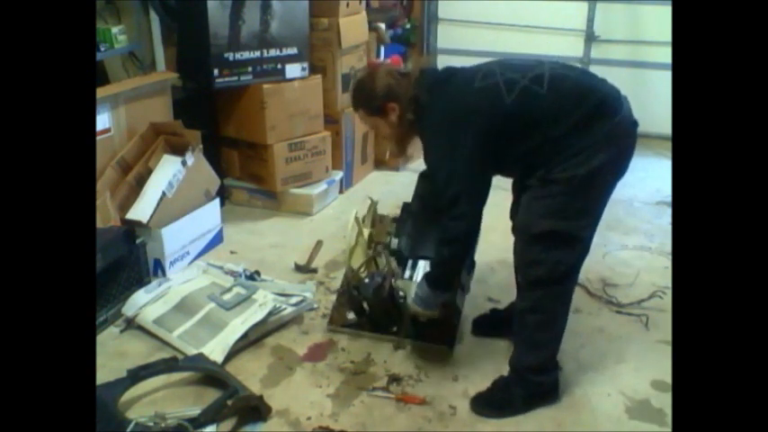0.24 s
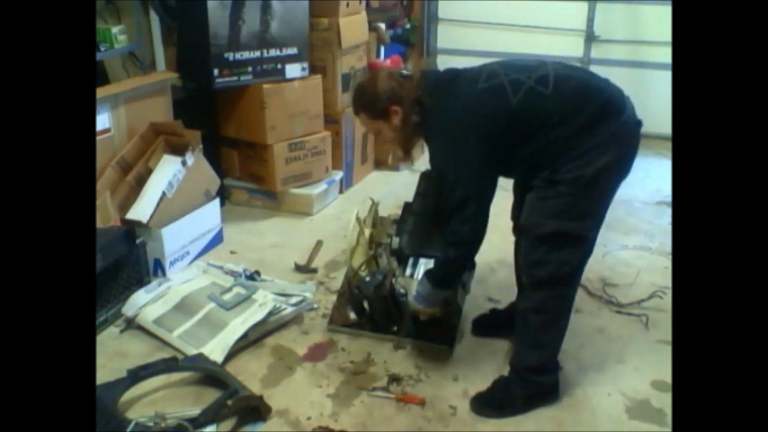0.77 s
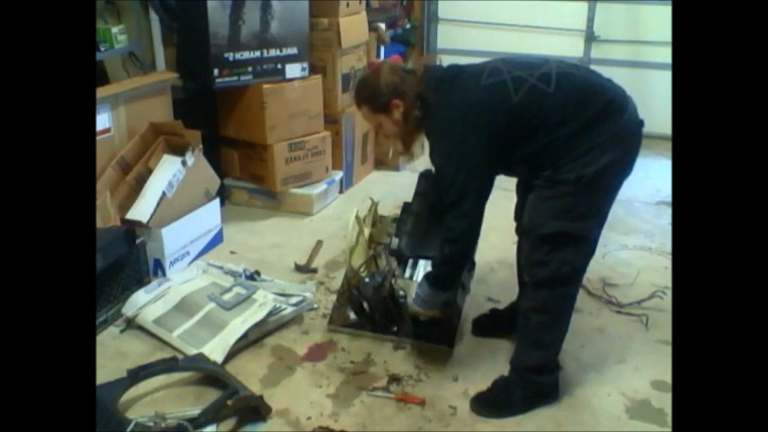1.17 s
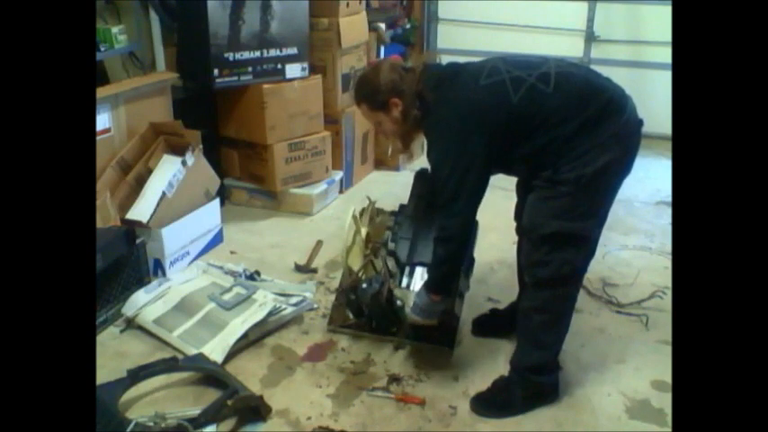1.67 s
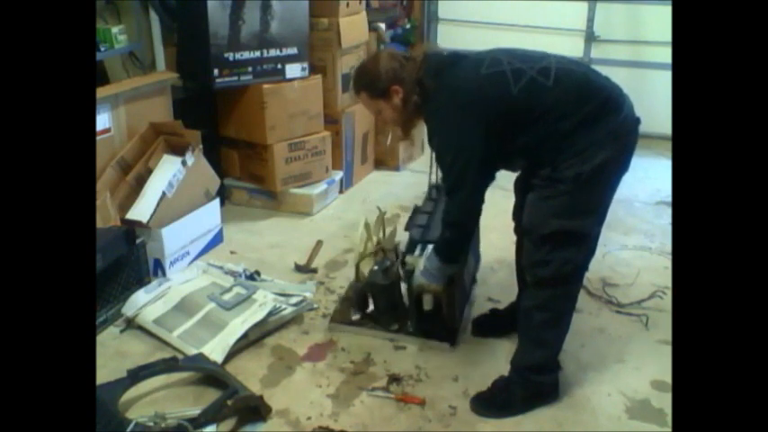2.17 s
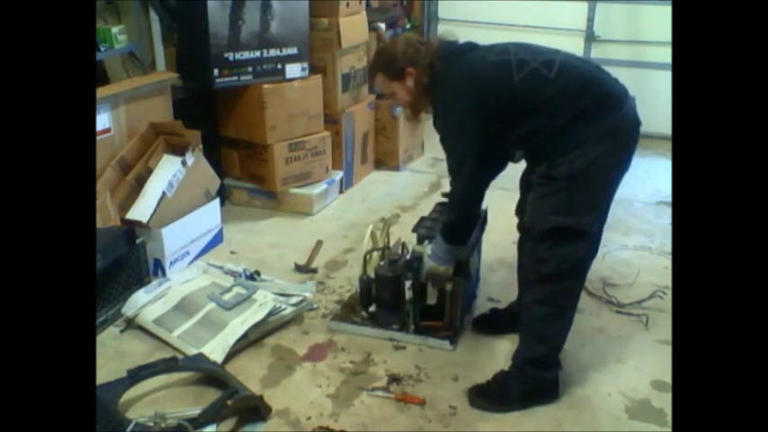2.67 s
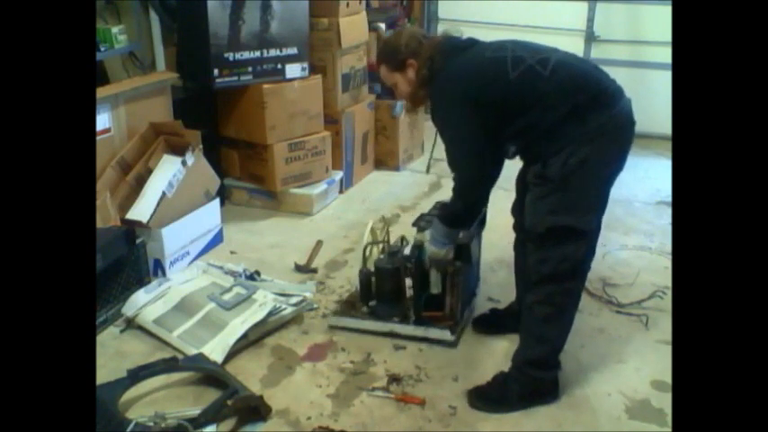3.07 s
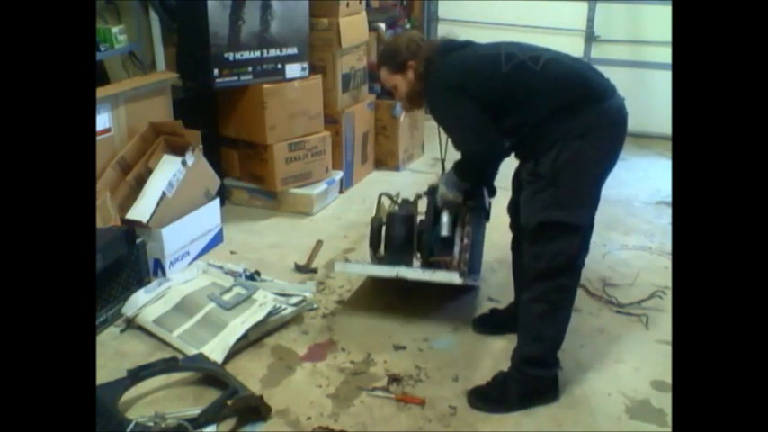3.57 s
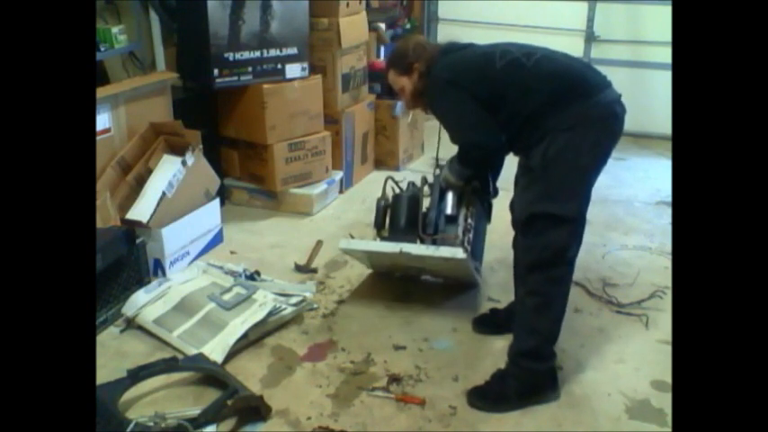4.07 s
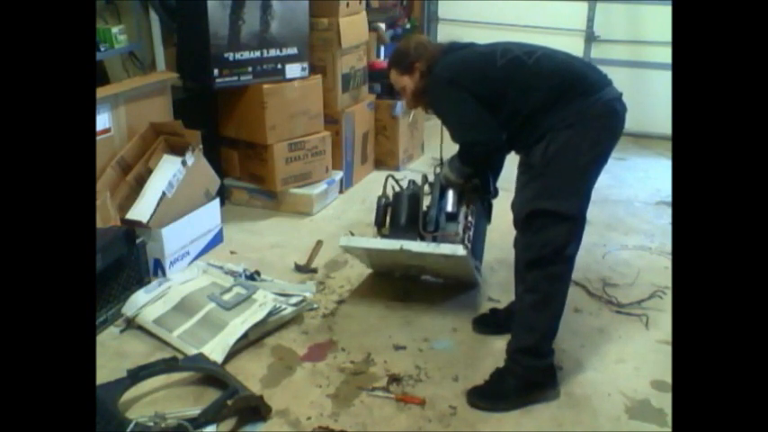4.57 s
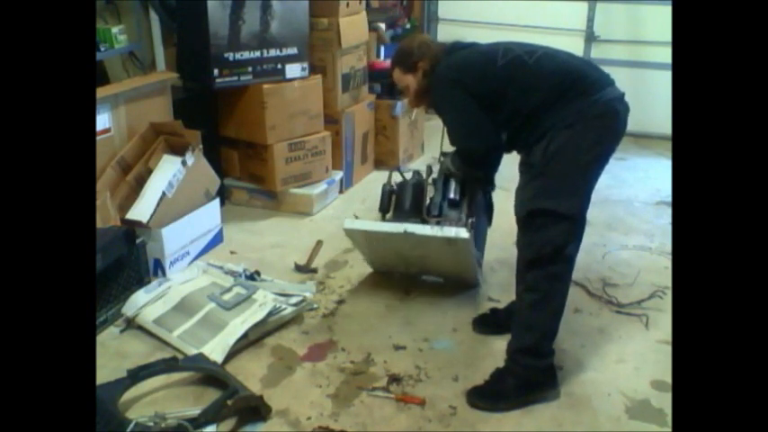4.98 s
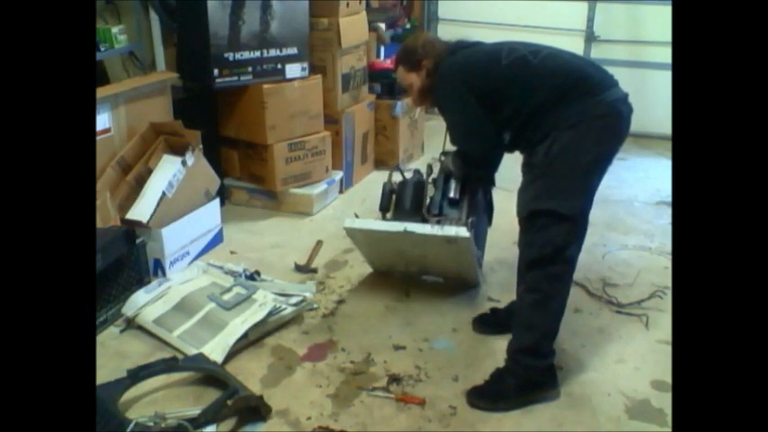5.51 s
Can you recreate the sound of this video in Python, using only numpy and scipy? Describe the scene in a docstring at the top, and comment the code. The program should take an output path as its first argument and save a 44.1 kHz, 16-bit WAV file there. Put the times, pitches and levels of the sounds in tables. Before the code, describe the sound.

A short fading hiss of escaping gas, followed by steel base knocks, gritty scrapes and a loose metallic clank in a garage over a low hum.

```python
"""Refrigerant hisses from a cut line, as turbulent noise whose level sags with its pressure.
A cooling unit is handled on a concrete garage floor: its steel base pan knocks and scrapes, its copper
tubing ticks and squeaks, and a loose part clanks. Each impact excites dense and clear modes in the garage.
A machine drones behind as an uneven, fluttering hum with partials, over shaped room noise and faint tones."""
import sys
import numpy as np
from scipy import signal
from scipy.fft import rfft, irfft, next_fast_len
from scipy.io import wavfile
from scipy.ndimage import map_coordinates

SR = 44100
rng = np.random.default_rng(int(sys.argv[2]) if len(sys.argv) > 2 else 0)


def store_wav(level_fs):
    """Save 16-bit WAV to argv[1]."""
    pcm = np.round(np.clip(np.atleast_2d(level_fs), -1, 1) * 32767)
    wavfile.write(sys.argv[1], SR, pcm.T.astype(np.int16))


N = 253393
TIME = np.arange(N) / SR
RING = 2 ** 15  # samples in one impact response

# Dense ring of the steel base pan. Each row: frequency in Hz, relative spectral density in dB.
PAN_COLOUR = [(30, -1.5), (70, -4), (115, 7.5), (150, -11), (195, 4), (330, 6), (550, 5), (1000, 3),
              (1200, 0.5), (2100, -2.5), (2750, -11), (3300, -19.5), (11000, -34), (15000, -48.5)]
# Strongest modes of the pan. Each row: frequency in Hz, relative level in dB, 60 dB decay time in seconds.
PAN_MODES = [(112.5, -18.5, .3), (201.3, -7, 0.21), (316, -4.5, 0.26), (416, 3.5, 0.24), (495, -2, 0.2),
             (545.8, -7, 0.26), (566, -4.5, 0.24), (697, -9.5, 0.33), (779, -13.5, 0.42), (899, -2, 0.1),
             (1063.5, -8, 0.24), (1230, -24.5, .25), (1300, -25, 0.43), (2203, -18.5, 0.35),
             (8200, -42.5, 0.31)]


def gain_of(db):
    """Level definition: decibels to an amplitude ratio."""
    return 10 ** (np.asarray(db) / 20)


def evened(x):
    """Normalization: scales to an rms of 1."""
    return x / np.sqrt(np.mean(x ** 2) + 1e-20)


def read(points, hz):
    """Spectral interpolation: joins the points on a log-frequency axis."""
    f, value = np.transpose(points)
    return np.interp(np.log(hz + 1), np.log(f + 1), value)


def add(mix, s, sound):
    """Superposition: mixes a sound in at time s, in seconds."""
    part = mix[round(s * SR):][:len(sound)]
    part += sound[:len(part)]


def noise(colour, peaks=()):
    """Spectral shaping: white noise takes a given spectrum and resonances, at an rms of 1."""
    size = next_fast_len(N)
    hz = np.fft.rfftfreq(size, 1 / SR)
    db = read(colour, hz)
    for f, width, lift in peaks:
        db = db + lift / (1 + (2 * (hz - f) / width) ** 2)
    spectrum = rfft(rng.standard_normal(size)) * gain_of(db)
    return evened(irfft(spectrum, size)[:N])


def waver(rate):
    """Random modulation: splined chance of rms 1 with about rate changes a second."""
    knots = rng.standard_normal(2048)
    coarse = evened(map_coordinates(knots, [TIME[::64] * rate], order=2, mode="wrap"))
    return coarse.repeat(64)[:N]  # each value is held for 64 samples


def ripple(hz, spacing_hz):
    """Random modal response: chance peaks and dips along the frequency axis, rms 1."""
    knots = rng.standard_normal(1024)
    return evened(map_coordinates(knots, [hz / spacing_hz], order=2, mode="wrap"))


def causal(x, gain):
    """Minimum phase: filters with the least delay, so that nothing sounds before a blow."""
    log_gain = np.log(np.maximum(np.r_[gain, gain[-2:0:-1]], 1e-5))
    response = np.exp(np.conj(signal.hilbert(log_gain)))[:len(gain)]
    return irfft(rfft(x) * response)


def echoes(early, early_s, direct):
    """Room impulse response: direct sound, strong near reflections, then frequency-dependent decay."""
    # Reverberation of the garage. Each row: frequency in Hz, 60 dB decay time in seconds.
    decay_times = [(100, 0.28), (300, 0.37), (700, 0.41), (1700, 0.46), (4600, 0.39), (12000, 0.27)]
    t = np.arange(RING) / SR
    taps = rng.choice([-1., 1.], RING) * (rng.random(RING) < np.minimum(.06 + 3 * t, 1))
    taps /= np.sqrt(np.minimum(0.073 + 3 * t, 1))  # reflections crowd together with time
    hz, at, z = signal.stft(taps, SR, nperseg=256)
    decay = gain_of(-60 * at / read(decay_times, hz)[:, None])
    tail = signal.istft(z * decay, SR, nperseg=256)[1][:RING]
    tail *= 1 + early * np.exp(-t / early_s)
    tail[0] += direct
    return tail / (1 + early / 2)


def strike(colour, modes, force_db, hard_db, weight_db, ring_db, tick_db,
           early, early_s, direct, rise_s, uneven_db):
    """Modal excitation: a blow rings dense and clear modes; weight sets bass, contact hardness treble."""
    t, hz = np.arange(RING) / SR, np.fft.rfftfreq(RING, 1 / SR)
    top_db = tick_db + 1.57 * hard_db  # the top treble grows faster with hardness
    contact = [(400, weight_db), (1100, 0), (2300, 0), (3800, hard_db), (6000, hard_db), (9000, top_db)]
    # each contact point favours its own groups of high modes
    spot = uneven_db * ripple(hz, 170) * hz / (hz + 1500)
    body = evened(gain_of(read(colour, hz)))
    dense = causal(echoes(early, early_s, direct), body * gain_of(read(contact, hz) + spot))
    ring = np.zeros(RING)
    for f, db, t60 in modes:
        ring += gain_of(db - 60 * t / t60) * np.sin(2 * np.pi * (f * t + rng.random()))
    ring *= 1 - np.exp(-t / rise_s)
    return gain_of(force_db) * (dense + gain_of(ring_db) * ring)


def blows(rows, colour, modes, **ringing):
    """Superposition of single impacts on one object."""
    out = np.zeros(N)
    for s, *touch in rows:
        add(out, s, strike(colour, modes, *touch, **ringing))
    return out


def air(level_db=-72, waver_db=2):
    """Ambient noise: a broadband spectrum with a few faint tones of wavering level and phase."""
    # Still air of the garage. Each row: frequency in Hz, relative spectral density in dB.
    air_colour = [(20, -2), (45, 4.5), (70, 1), (130, -3), (200, -10.5), (330, -13.5), (500, -16.5),
                  (900, -18), (2200, -26), (3300, -31), (6000, -33.5), (10000, -32), (13000, -39),
                  (15000, -55)]
    # Faint tones of fixed pitch whose level and phase waver. Each row: frequency in Hz, mean level in dB.
    faint_tones = [(141, -81.5), (211, -90.5), (283, -83.5), (426, -94), (9720, -100.5)]
    tones = np.zeros(N)
    for f, db in faint_tones:
        phase = 2 * np.pi * f * TIME + 0.53 * waver(12)
        tones += gain_of(db + waver_db * waver(1.8)) * np.sin(phase)
    return gain_of(level_db) * noise(air_colour) + np.sqrt(2) * tones


def drone(pitch_hz=90, wander=0.01184, waver_db=3, rumble_db=-18):
    """Harmonic series: a machine's hum rises and dips unevenly and flutters by chance, over a rumble."""
    # Uneven rises and dips of the hum, some within a tenth of a second.
    # Each row: time in seconds, level in dB.
    hum_levels = [(0.0, -66), (0.18, -69), (0.33, -56.5), (0.68, -63.5), (0.99, -63.5), (1.49, -52),
                  (1.63, -65.5), (1.93, -54.5), (2.1, -70), (2.35, -52.5), (2.43, -68), (2.58, -54.5),
                  (3.48, -61), (3.72, -66.5), (4.09, -54.5), (5.01, -65.3), (5.58, -66.5), (5.74, -52.5)]
    # Partials. Each row: multiple of the pitch, relative level in dB.
    orders = [(2, -21), (3, -29), (4, -28.5)]
    # Common lift of the partials. Each row: time in seconds, lift in dB.
    buzz = [(0, -7), (.35, 6), (1.4, 1), (1.95, -8.5), (3.4, 5.5), (4.1, -3.5), (4.75, 4), (5.2, -5),
            (5.75, 1)]
    level = gain_of(np.interp(TIME, *np.transpose(hum_levels)))
    flutter = 1 + .28 * waver(15)
    turn = 2 * np.pi * np.cumsum(pitch_hz * (1 + wander * waver(14))) / SR
    partials = np.zeros(N)
    for k, db in orders:
        partials += gain_of(db + waver_db * waver(6)) * np.sin(k * turn)
    partials *= gain_of(np.interp(TIME, *np.transpose(buzz)))
    hum = np.sqrt(2) * (flutter * np.sin(turn) + partials)
    rumble = noise([(30, 1.5), (110, -1.5), (300, -2.5), (600, -25.5), (2000, -29.5), (6000, -75)])
    return level * (hum + gain_of(rumble_db) * rumble)  # the rumble rises and dips with the hum


def squeaks(jitter=0.048, chatter_db=4):
    """Stick-slip friction: tubes rub on the frame in rough gliding notes with inharmonic overtones."""
    # Each row: start in seconds, length in seconds, relative level in dB, start pitch in Hz,
    # end pitch in Hz, lift of the overtones in dB.
    rubs = [(3.559, 0.055, -72, 2543, 2530, 2.5), (3.598, 0.051, -79, 4900, 4780, -24),
            (4.69, 0.047, -62.5, 2460, 2267, -27), (4.901, 0.0474, -76.5, 2320, 1950, -7),
            (5.137, 0.04, -85, 2766, 2620, -11)]
    # Overtones. Each row: multiple of the pitch, relative level in dB.
    overtones = [(1.451, -9), (1.911, -20), (2.62, -17), (2.93, -20)]
    dry = np.zeros(N)
    for s, length, level_db, start_hz, end_hz, overtones_db in rubs:
        u = np.linspace(0, 1, round(length * SR))
        hz = (start_hz + (end_hz - start_hz) * u) * (1 + jitter * waver(400)[:len(u)])
        turn = 2 * np.pi * np.cumsum(hz) / SR
        note = np.sin(turn)
        for k, db in overtones:
            note += gain_of(db + overtones_db) * np.sin(k * turn)
        level = gain_of(level_db + chatter_db * waver(300)[:len(u)])
        add(dry, s, level * note * np.sin(np.pi * u))
    room = echoes(early=0.21, early_s=0.042, direct=16)
    return 2 * signal.fftconvolve(dry, room / np.linalg.norm(room))[:N]


def tubing_taps():
    """Impact excitation: copper tubing ticks with a few lightly damped modes."""
    # Each row: start in seconds, force in dB, contact hardness in dB.
    taps = [(.303, -47, 3), (2.091, -72, 5), (2.478, -57.5, 7), (2.98, -65.5, 9), (3.245, -66.5, 6.5),
            (3.5227, -80, 7.5), (3.5636, -63.5, -2.5), (4.1303, -72, -5), (4.699, -69.5, 0.5),
            (4.9141, -68, -4.5)]
    # Dense ring. Each row: frequency in Hz, relative spectral density in dB.
    tap_colour = [(150, -23.5), (500, 7), (1000, -3), (1600, -0.5), (2300, 9), (3200, -11.5), (5000, -20.5),
                  (7500, -15.5), (12000, -11.5), (15000, -36)]
    # Clear modes. Each row: frequency in Hz, relative level in dB, 60 dB decay time in seconds.
    tap_modes = [(2250, -1.5, 0.63), (2140, -6, .4), (2380, -3.5, .45), (2570, -9.5, 0.25)]
    return blows(taps, tap_colour, tap_modes, weight_db=-8, ring_db=-8, tick_db=1,
                 early=0.18, early_s=0.017, direct=8.9, rise_s=0.0026, uneven_db=3.5)


def clank(note_hz=1037, struck_db=-34, note_t60=0.21, sing_at_s=4.395, sing_width_s=0.05, sing_db=-46.5):
    """Impact, then friction: a loose part bounces; its main mode decays and sings again as it slides to rest."""
    # Bounces on the frame. Each row: start in seconds, force in dB.
    bounce_rows = [(4.236, -33), (4.2585, -37), (4.286, -43), (4.343, -52)]
    # Dense ring. Each row: frequency in Hz, relative spectral density in dB.
    clank_colour = [(100, -42.5), (280, -23.5), (450, -12), (700, -2.5), (950, 5), (1350, -1.5), (2200, -2),
                    (2700, -13.5), (3500, -22.5), (5000, -18.5), (7500, -29.5), (9000, -26.5),
                    (12000, -27.5), (15000, -46.5)]
    # Clear modes. Each row: frequency in Hz, relative level in dB, 60 dB decay time in seconds.
    clank_modes = [(427.6, -15.5, 0.42), (915, 0, 0.24), (1257, -4.5, .37), (1300, -7.5, 0.32),
                   (1550, -5.5, 0.32), (1750, -5, 0.4), (2070, -7, .45), (2093, -6, 0.22),
                   (2229, -0.5, 0.19), (4230, -34, 0.29), (4940, -18.5, 0.27), (8820, -23, 0.27),
                   (11400, -23, 0.21)]
    bounces = blows(bounce_rows, clank_colour, clank_modes, hard_db=-6, weight_db=-1, ring_db=-5,
                    tick_db=9.5, early=1.0, early_s=0.13, direct=11.2, rise_s=0.0027, uneven_db=5.5)
    t = np.maximum(TIME - bounce_rows[0][0], 0)
    struck = gain_of(struck_db - 60 * t / note_t60) * (1 - np.exp(-t / .003))
    rubbed = gain_of(sing_db) * np.exp(-((TIME - sing_at_s) / sing_width_s) ** 2)
    note = np.sqrt(2) * np.sin(2 * np.pi * note_hz * TIME + 0.33 * waver(30))
    return bounces + (struck + rubbed) * note


def scrapes(slips_per_s=900):
    """Friction as random impacts: the pan slides on grit in a swelling and fading swarm of tiny blows."""
    # Each row: start in seconds, length in seconds, force in dB, contact hardness in dB, weight in dB,
    # level of the clear modes in dB.
    slides = [(0.359, 0.049, -44, 18.5, -19, -17.5), (1.948, 0.48, -56.5, 3, -42, -28),
              (2.146, 0.074, -49.5, 8.5, -7, -20), (2.216, .075, -42.5, 7, 7, -6),
              (2.341, 0.064, -60.5, 18.5, -12, -12), (2.455, 0.054, -41, -3, -10, 8.5),
              (2.732, .11, -48.5, -5.5, 6, -24), (2.936, .088, -50.5, 14, -17, -8),
              (3.245, 0.058, -55.5, 13, 8.5, -10), (3.64, 0.13, -59, 3, -14.5, -15),
              (3.761, 0.049, -55, -5, -10, -7.5), (3.815, 0.11, -62, 0.5, -13.5, -15),
              (4.14, .057, -62.5, 5, 4, -17), (4.716, 0.043, -62, 14.5, -26, -18)]
    out, t = np.zeros(N), np.arange(RING) / SR
    for s, length, *touch in slides:
        slips = (rng.random(RING) < slips_per_s / SR) * rng.standard_normal(RING)
        slips *= np.sin(np.pi * np.minimum(t / length, 1))
        slips /= np.linalg.norm(slips) + 1e-9
        one = strike(PAN_COLOUR, PAN_MODES, *touch, tick_db=-7.5, early=0.53, early_s=0.017,
                     direct=9.8, rise_s=0.015, uneven_db=2.0)
        add(out, s, signal.fftconvolve(slips, one))
    return out


def pan_knocks():
    """Impact excitation: the steel base pan rings as it knocks against the floor."""
    # Each row: start in seconds, force in dB, contact hardness in dB, weight in dB,
    # level of the clear modes in dB.
    knocks = [(.283, -42.5, 2.5, -31, -25), (2.194, -41, -16, -13.5, -14), (2.224, -41, -5, 4.5, -19),
              (2.275, -44.5, -9, 7, -15), (2.4914, -36, -3, -0.5, 5), (2.516, -37.5, -5, 2, -12.5),
              (2.7214, -51.5, -6, 12.5, 2), (2.7428, -54.5, -2, 13.5, -22), (2.8466, -31, 2, 0, -4),
              (2.869, -41.5, 8, 9.5, 2), (2.922, -43, 4.5, 5, 0.5), (3.0456, -37, -10.5, -7.5, -13.5),
              (3.085, -44.5, -13, -8.5, -8)]
    return blows(knocks, PAN_COLOUR, PAN_MODES, tick_db=-2, early=0.33, early_s=0.052,
                 direct=3.2, rise_s=0.004, uneven_db=2)


def gas(level_db=2, flutter_db=.5, roar_hz=4500):
    """Turbulent jet noise: each spurt from the cut tube opens, sags with its pressure and fades."""
    # Spurts. Each row: start in seconds, length in seconds, relative level in dB, opening time in seconds,
    # gain of the low roar in dB.
    spurts = [(-0.13, 1.136, -49.5, 0.21, 2), (3.666, 0.67, -68, 0.47, -1), (5.115, 0.96, -71, 0.33, -1.5)]
    # Jet spectrum. Each row: frequency in Hz, relative spectral density in dB.
    jet_colour = [(200, -14), (500, -12), (800, -4.5), (1200, -1.5), (1800, 6), (2300, 2), (2800, 3),
                  (3300, -5.5), (5000, 0.5), (7000, -3.5), (9000, 4), (11000, 3.5), (13300, -3.5),
                  (15300, -25)]
    # Whistling of the tube end. Each row: frequency in Hz, width in Hz, lift in dB.
    whistles = [(2243, 200, 6), (10350, 180, 0.5), (11180, 410, 6.5), (12840, 170, 7)]
    sag_db, sag_power = 15.5, 3.14  # the pressure sags ever faster over a spurt
    fade_db_per_s = 94  # then the hiss dies away
    jet = noise(jet_colour, whistles) * gain_of(flutter_db * waver(30))
    roar = signal.sosfiltfilt(signal.butter(2, roar_hz, fs=SR, output="sos"), jet)
    out = np.zeros(N)
    for s, length, db, open_s, roar_db in spurts:
        t = np.maximum(TIME - s, 0)
        opening = 1 - np.exp(-(t / open_s) ** 2)
        lost_db = sag_db * np.minimum(t / length, 1) ** sag_power
        lost_db += fade_db_per_s * np.maximum(t - length, 0)
        hiss = jet + (gain_of(roar_db) - 1) * roar
        out += gain_of(level_db + db - lost_db) * opening * hiss
    return out


def scene():
    """Superposition: all sources add at one small microphone, alike in both channels."""
    background = air() + drone()
    handling = squeaks() + tubing_taps() + clank() + scrapes() + pan_knocks()
    return np.tile(background + handling + gas(), (2, 1))


def record(dry):
    """Band limitation: a linear-phase low-pass removes the sound above about 15 kHz."""
    low_pass = signal.firwin(511, 15250, window=("kaiser", 9), fs=SR)
    return signal.oaconvolve(dry, low_pass[None], "same")


dry = scene()
out = record(dry)
store_wav(out)
```